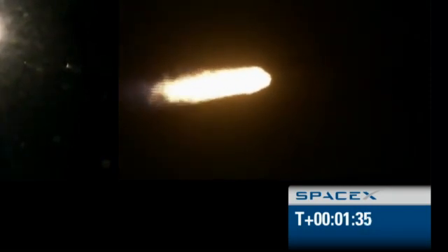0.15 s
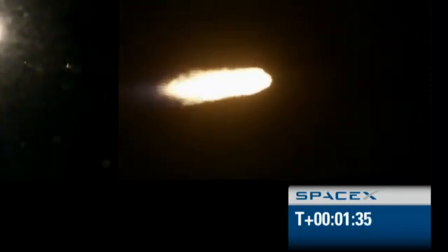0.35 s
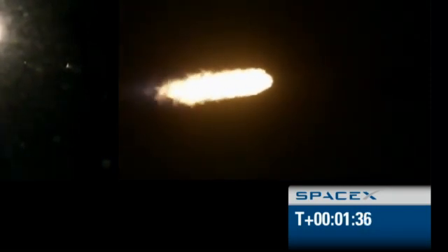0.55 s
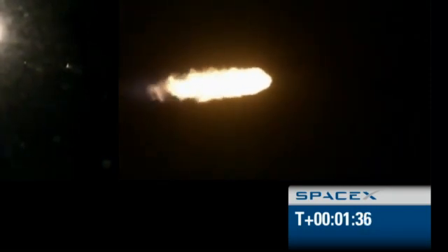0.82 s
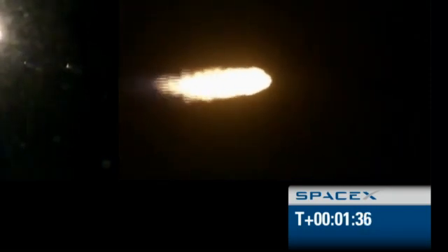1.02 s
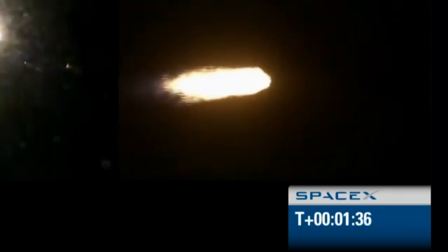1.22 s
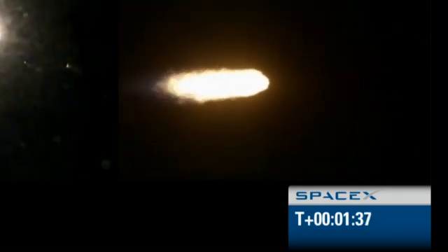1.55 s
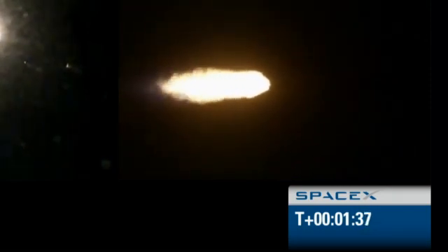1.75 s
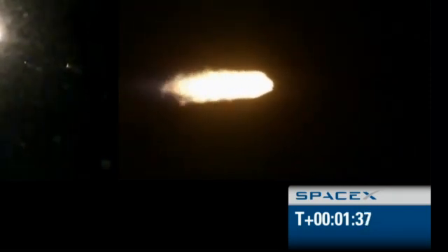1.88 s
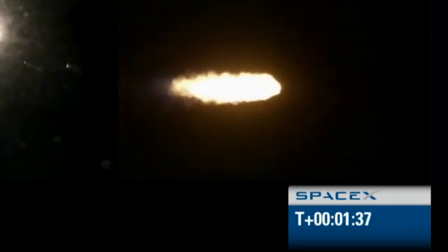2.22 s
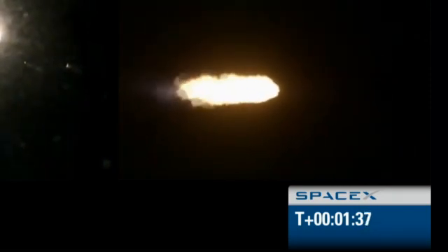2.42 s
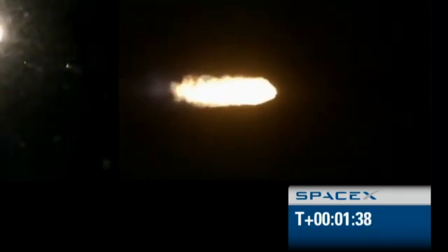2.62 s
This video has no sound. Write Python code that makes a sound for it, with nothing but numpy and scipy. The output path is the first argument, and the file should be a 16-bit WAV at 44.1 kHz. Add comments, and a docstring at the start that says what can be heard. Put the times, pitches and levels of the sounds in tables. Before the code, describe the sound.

A far-off rocket's heavy low roar, torn by hard distorted snaps and pops, then easing

```python
"""A distant rocket: a deep, heaving rumble, a fluttering mid-range roar and a steady hiss, all shaped noise.
From the start, the sound snaps sharply at its strongest pressure waves: a crack is a flat step of up to about 5
ms, a tick is one sample. Each snap returns 5 ms later as a tinny ring, then as one bright glint, and leaves a
faint, bright room tail. Halfway through the rumble eases off, just after which the roar swells briefly; weaker
cracks follow in the last third, two of them with a tiny sputter."""
import sys
import numpy as np
from scipy import signal
from scipy.fft import rfft, irfft
from scipy.io import wavfile
from scipy.ndimage import uniform_filter1d

SR = 44100
rng = np.random.default_rng(int(sys.argv[2]) if len(sys.argv) > 2 else 0)


def to_wav(s):
    """Save 16-bit WAV."""
    ch = np.atleast_2d(s).T  # columns
    pcm = np.round(np.clip(ch, -1, 1) * 32767)  # PCM
    wavfile.write(sys.argv[1], SR, pcm.astype(np.int16))


N = 121275

# cracks, each a flat step: start_s, length_ms, step_db
CRACKS = [(0.0881, .93, -7), (.3341, 3.34, -5), (0.4024, 1.59, -5), (0.6025, 1.13, -4.5),
          (.7476, .32, -4.5), (.9154, 3.6, -5), (1.0184, 1.84, -5), (1.1459, 2.86, -4), (1.1983, 5.28, -6),
          (1.2808, 5.17, -5.5), (1.3359, 2.11, -6), (1.4553, 0.876, -5), (1.5927, 1.43, -9),
          (2.1647, 1.7, -10.5), (2.2163, 1.21, -9.5), (2.3477, 1.005, -10), (2.3985, 1.095, -10)]
# ticks of a single sample: start_s, level_db, polarity
TICKS = [(.4997, 2, -1), (.8663, 4.5, 1), (.8997, 1.5, -1), (1.1663, 4, 1), (1.5996, 0.5, -1),
         (2.6329, -0.5, 1)]

WAVE_S, WAVE_LEAD_S = .038, .00595  # length of a large pressure wave; its start ahead of the crack
WAVE_DB, TICK_WAVE_DB = .5, -8.5    # wave height relative to the crack's step or to the tick
WAVE_EDGE = 2.86   # higher: the wave takes over from the churn more abruptly
WAVE_SKEW = .77    # under 1 the first half of the wave is quick and the second slow
GUST_HZ, GUST_DB = 21.8, 2  # flutter rate and rms depth
RUMBLE_CEILING = .85        # full scale = 1
HISS_DB = -56.5
ECHO_S, ECHO_DB = .0047, .5
GLINT_S, GLINT_HZ, GLINT_WIDTH_HZ, GLINT_DB = .0163, 8700, 400, -9
SPUTTER_S = .0005
RIGHT_DB = .28   # how much louder the bed is on the right than on the left
TOP_HZ = 10650


def undb(db):
    """Decibels to gain."""
    return 10 ** (np.asarray(db) / 20)


def curve(rows):
    """Gain over time from rows of time_s, level_db."""
    time_s, level_db = np.array(rows).T
    return undb(np.interp(np.arange(N) / SR, time_s, level_db))


def noise(colour):
    """Noise of unit rms whose spectrum follows rows of frequency_hz, relative level_db per Hz."""
    hz, db = np.array(colour).T
    bins_hz = np.fft.rfftfreq(N, 1 / SR)
    gain = undb(np.interp(np.log(bins_hz + 1), np.log(hz), db))
    shaped = irfft(rfft(rng.standard_normal(N)) * gain, N)
    return shaped / shaped.std()


def resonate(x, hz, width_hz):
    """One resonance, gain 1 at its centre."""
    b, a = signal.iirpeak(hz, hz / width_hz, fs=SR)
    return signal.lfilter(b, a, x)


def delay(x, seconds):
    """The same sound, later."""
    return np.pad(x, (int(seconds * SR), 0))[:N]


def gusts(rate_hz):
    """Moving air: a gain that wanders at random, up to about `rate_hz` times a second."""
    hz = np.fft.rfftfreq(N, 1 / SR)
    smoothing = np.exp(-(hz / rate_hz) ** 2)
    walk = irfft(rfft(rng.standard_normal(N)) * smoothing, N)
    return undb(GUST_DB * walk / walk.std())


def swing(churn, start, height):
    """One lopsided cycle of a large pressure wave takes over from the churn; trough first if height > 0."""
    phase = np.clip((np.arange(N) / SR - start) / WAVE_S, 0, 1)
    fade = np.minimum(WAVE_EDGE * np.sin(np.pi * phase), 1)
    share = np.sin(fade * np.pi / 2) ** 2
    wave = np.sin(2 * np.pi * phase ** WAVE_SKEW)
    return churn * (1 - share) - share * height * wave


def rumble():
    """Low exhaust turbulence; cracks sit in the trough of a large wave, ticks on the slope of one."""
    # colour of the deep churn: frequency_hz, relative level_db per Hz
    churn_colour = [(12, -37), (21, 5), (35, -2), (60, -5.5), (85, -13), (150, -26.5), (220, -37.5),
                    (330, -41.5), (600, -80), (2000, -110)]
    # strength of the churn ahead of waves and soft limit: time_s, level_db
    effort = [(0, -16.5), (.2, -10.5), (.45, -10), (.65, -6), (.85, -9.5), (1.1, -9.5), (1.48, -8),
              (1.6, -14.5), (1.85, -16), (2.3, -17.5), (2.5, -15), (2.75, -20)]
    # colour of the upper bass: frequency_hz, relative level_db per Hz
    buffet_colour = [(50, -21), (100, 2), (150, -3), (220, -11), (320, -21), (700, -58), (2000, -100)]
    # strength of the upper bass ahead of gusts and soft limit: time_s, level_db
    buffet_level = [(0, -34), (.22, -31), (.35, -29), (.52, -33), (.62, -23), (.8, -26), (.97, -29.5),
                    (1.15, -23), (1.45, -39), (1.65, -33), (1.8, -34), (2.15, -40), (2.4, -32.5),
                    (2.75, -30)]

    churn = noise(churn_colour)
    running_rms = np.sqrt(uniform_filter1d(churn ** 2, size=9000))  # about 0.2 s
    churn = churn / running_rms * curve(effort)
    for start, _, db in CRACKS:
        churn = swing(churn, start - WAVE_LEAD_S, undb(db + WAVE_DB))
    for start, db, polarity in TICKS:
        churn = swing(churn, start - WAVE_S / 3, np.sign(polarity) * undb(db + TICK_WAVE_DB))
    buffet = noise(buffet_colour) * curve(buffet_level) * gusts(GUST_HZ)
    return RUMBLE_CEILING * np.tanh((churn + buffet) / RUMBLE_CEILING)


def roar():
    """Mid-range noise that moving air makes flutter."""
    # colour: frequency_hz, relative level_db per Hz
    roar_colour = [(80, 8), (220, -0.5), (430, 0), (700, -7.5), (980, -6.5), (1300, -19), (1600, -17),
                   (2300, -32), (5000, -33.5)]
    # level ahead of the gusts: time_s, level_db
    roar_level = [(0, -46), (.3, -42.5), (.55, -39), (.75, -39), (1.3, -38), (1.53, -41), (1.66, -32.5),
                  (1.77, -37.5), (1.85, -43.5), (2.15, -45.5), (2.45, -46), (2.6, -43.5), (2.75, -40)]
    return noise(roar_colour) * curve(roar_level) * gusts(GUST_HZ)


def hiss():
    """Steady noise that slopes down toward the treble."""
    # colour: frequency_hz, relative level_db per Hz
    hiss_colour = [(200, 6), (2000, 3), (4000, -3), (7000, -4.5), (9500, -7.5), (11000, -13)]
    return undb(HISS_DB) * noise(hiss_colour)


def snaps():
    """Snaps: a flat-topped step for each crack, a single spike for each tick, an occasional sputter."""
    # fizz as a crack lets go: start_s, level_db
    sputters = [(2.1666, -17), (2.3999, -16.5)]
    out, n = np.zeros(N), np.arange(N)
    for start, length_ms, db in CRACKS:
        age = n - int(start * SR)
        # the last sample is partial, so a length may fall between samples
        step = (age >= 0) * np.clip(length_ms * SR / 1000 - age, 0, 1)
        out += undb(db) * step
    for start, db, polarity in TICKS:
        out[int(start * SR)] += np.sign(polarity) * undb(db)
    fizz = np.diff(rng.standard_normal(N + 1))  # treble-heavy noise
    for start, db in sputters:
        gate = (n >= start * SR) * (n < (start + SPUTTER_S) * SR)
        out += undb(db) * fizz * gate
    return out


def ring(x):
    """A short echo through a bank of parallel, tinny resonances."""
    # resonances: frequency_hz, width_hz, level_db within the echo, polarity (only its sign counts)
    modes = [(442, 74, -6, 5), (544, 92, -9.5, 1), (697, 141, -4, 1), (836, 55, -0.5, 1),
             (1008, 166, 4, -1), (1143, 180, -0.5, -1), (1560, 115, 8.5, -1), (2260, 140, -4.5, 1),
             (2610, 110, -6, 1), (3750, 2040, -0.5, 1), (5440, 3400, -4.5, -1), (7410, 170, 6.5, -1),
             (8600, 1300, -1.5, 1), (9100, 420, -15, 1)]
    echo = np.zeros(N)
    for hz, width_hz, db, polarity in modes:
        echo += np.sign(polarity) * undb(db) * resonate(x, hz, width_hz)
    return undb(ECHO_DB) * delay(echo, ECHO_S)


def glint(x):
    """One bright reflection through a single treble resonance."""
    return undb(GLINT_DB) * delay(resonate(x, GLINT_HZ, GLINT_WIDTH_HZ), GLINT_S)


def room(x):
    """Decaying noise tails: a quick scatter, dull early reflections and a longer, brighter reverberation."""
    # colour before tilt: frequency_hz, relative level_db per Hz
    room_colour = [(200, -19.5), (450, -16.5), (1000, 4.5), (1350, -9.5), (1600, 0), (2500, -5), (4500, -3),
                   (6400, -3.5), (7700, 6.5), (9500, 9.5), (11000, -5)]
    # scatter, early reflections, reverberation: delay_s, level_db, t60_s, tilt_db per octave
    tails = [(.0052, -10.5, 0.017, 0.5), (0.014, -17.5, 0.12, -3), (.022, -15.5, 0.3, -0.5)]
    response = np.zeros(N)
    for wait, db, t60, tilt in tails:
        age = np.arange(N) / SR - wait
        tilted = [(hz, level + tilt * np.log2(hz)) for hz, level in room_colour]
        decay = (age > 0) * np.exp(-np.log(1000) * np.abs(age) / t60)
        tail = noise(tilted) * decay
        response += undb(db) * tail / np.sqrt(np.sum(tail ** 2))  # unit energy, then level
    return signal.fftconvolve(x, response)[:N]


def scene():
    """Rumble, roar and hiss a hair to the right; the crackle and its reflections in the centre."""
    bed = rumble() + roar() + hiss()
    balance = undb(np.array([[-RIGHT_DB], [RIGHT_DB]]) / 2)
    crackle = snaps()
    return bed * balance + crackle + ring(crackle) + glint(crackle) + room(crackle)


def record(dry):
    """The sound channel blocks steady pressure and cuts the top steeply."""
    blocker = signal.butter(1, 3, "highpass", fs=SR, output="sos")
    top_cut = signal.butter(20, TOP_HZ, fs=SR, output="sos")
    return signal.sosfiltfilt(top_cut, signal.sosfilt(blocker, dry))


dry = scene()
out = record(dry)
to_wav(out)
```